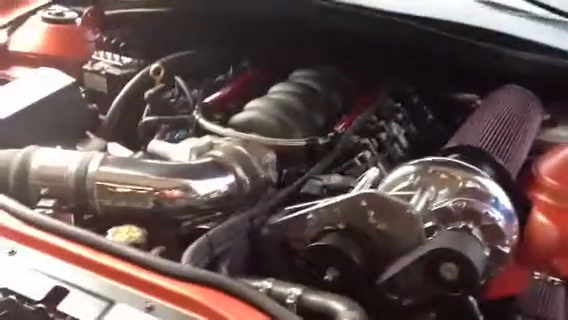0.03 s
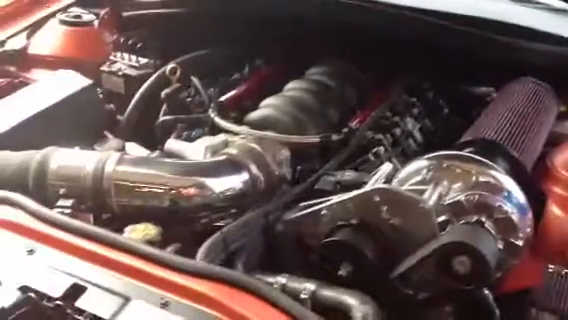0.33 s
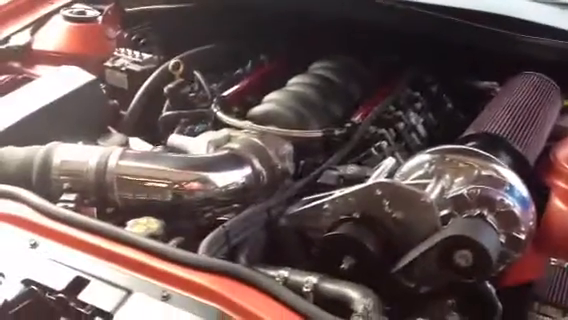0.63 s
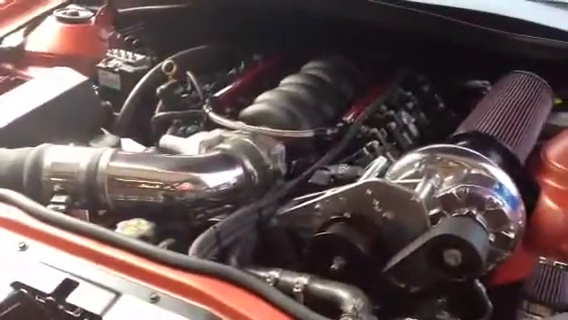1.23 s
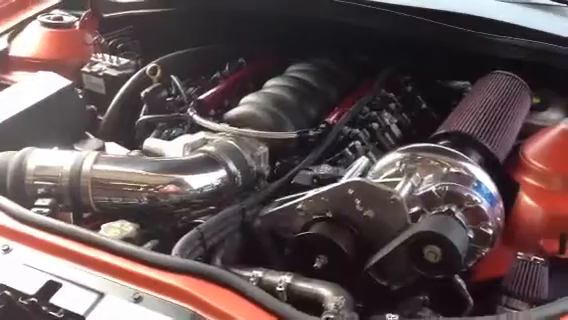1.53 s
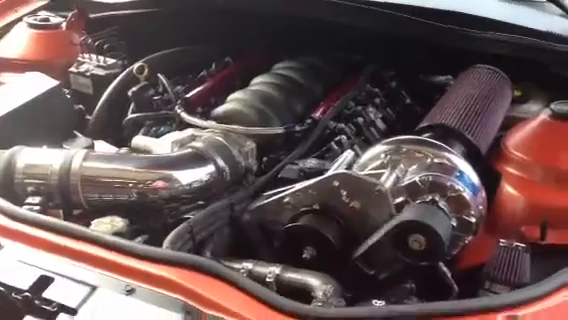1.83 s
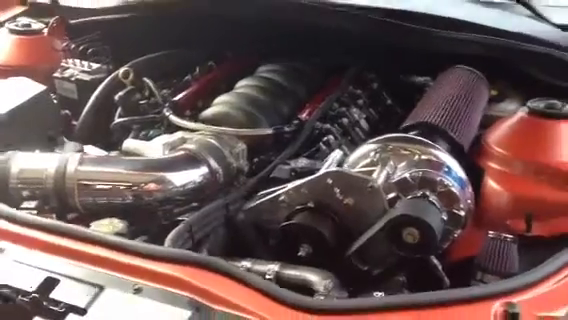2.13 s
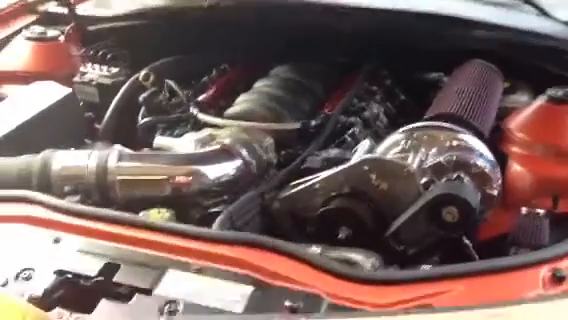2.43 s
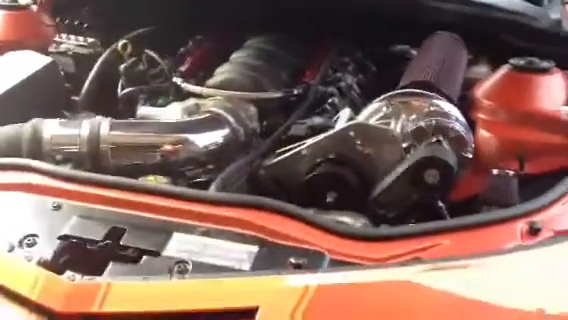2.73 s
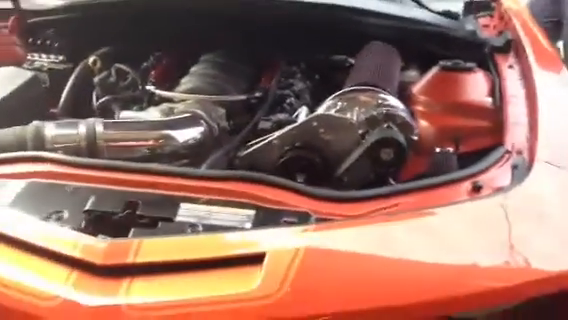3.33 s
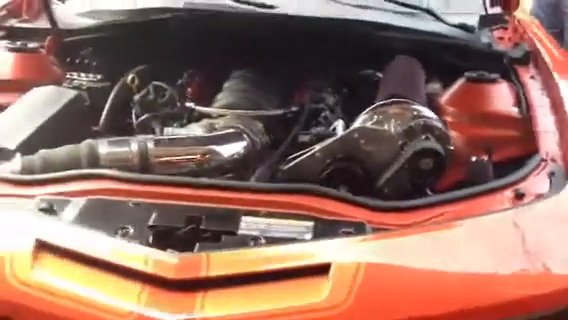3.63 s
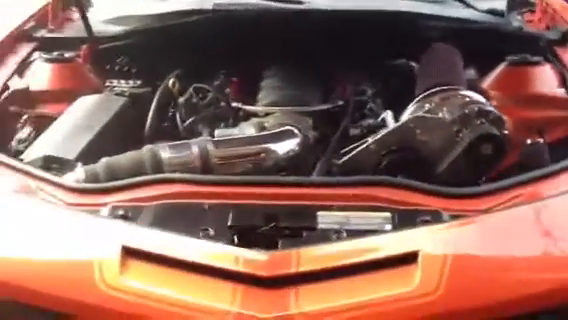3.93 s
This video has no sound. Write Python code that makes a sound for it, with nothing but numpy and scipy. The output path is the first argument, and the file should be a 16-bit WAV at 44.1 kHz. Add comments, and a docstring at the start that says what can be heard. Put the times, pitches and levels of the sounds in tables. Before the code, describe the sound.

A supercharged car engine idles for all four seconds, heard just above the open bonnet. A high, rapidly chirping squeal and thin whine waver and swell unevenly, strongest around 1.3 seconds. Beneath are a pulley hum, a lumpy exhaust rumble, light valve ticks and rushing air. From about 2 seconds the microphone moves back: the metallic ringing softens and the exhaust rises slightly while the squeal continues.

```python
"""At the open bonnet of an idling supercharged V8, microphone just above the engine bay.
Close up, each firing jerks the supercharger drive into a squealing chirp; its housing rings
and its whine wavers as the idle hunts. Underneath lie a pulley hum, the lumpy exhaust beat,
valve ticks and the rush of belts and intake air. From about halfway the microphone
moves back: the exhaust comes up a little and the lower housing rings fall away."""
import sys
import numpy as np
from scipy import signal
from scipy.fft import rfft, irfft
from scipy.io import wavfile
from scipy.ndimage import uniform_filter1d

SR = 44100
rng = np.random.default_rng(int(sys.argv[2]) if len(sys.argv) > 2 else 0)


def transcribe(u):
    """Save the signal u as a 16-bit wav file named by the first command-line argument.

    u: samples, shape (n,) or (channels, n), limited to [-1, 1]; the rate is SR.
    q: integer samples, one column per channel.
    """
    v = np.clip(np.atleast_2d(u).T, -1, 1)
    q = np.round(v * 32767).astype(np.int16)
    wavfile.write(sys.argv[1], SR, q)


N = 176400
TIME = np.arange(N) / SR

# The hunting idle: time_s, speed_rpm
CRANK_SPEED = [(0.0, 742), (0.71, 715), (0.8, 710), (1.1, 725), (1.56, 748), (1.77, 711), (1.9, 731),
               (2.02, 689), (2.27, 725), (2.74, 723), (2.8, 663), (2.84, 708), (3.43, 729), (3.55, 685),
               (3.68, 727), (4.0, 717)]
# Microphone to supercharger: time_s, distance (0 near, about 1 far)
MIC_DISTANCE = [(0, 0.14), (1.9, 0), (2.8, 0.67), (4, 1.1)]
# Supercharger drive: time_s, whine_pitch_hz, squeal_level_db
DRIVE_TRACK = [(0.0, 8146, -16), (0.09, 8021, -17), (0.14, 7930, -23), (0.21, 8037, -14.5),
               (0.28, 8015, -20), (0.32, 8000, -14), (0.38, 7786, -27.5), (0.43, 8080, -16),
               (0.49, 7666, -26), (0.57, 7750, -27.5), (0.66, 7982, -16.5), (0.72, 7768, -20),
               (0.86, 7550, -23.5), (0.9, 7978, -18), (1.0, 7925, -16), (1.05, 7604, -22),
               (1.16, 8170, -13), (1.28, 8060, -11), (1.34, 7874, -19.5), (1.42, 8030, -13),
               (1.6, 8205, -14), (1.66, 7990, -23.5), (1.72, 7717, -22), (1.77, 7914, -31),
               (1.81, 7990, -20), (1.94, 8040, -15), (1.99, 7860, -23.5), (2.06, 7495, -26),
               (2.16, 7556, -21), (2.21, 7544, -27), (2.27, 7925, -18.5), (2.33, 7809, -22),
               (2.38, 7990, -17.5), (2.5, 7893, -17.5), (2.55, 7540, -23), (2.61, 7905, -12.5),
               (2.7, 7850, -18), (2.79, 7328, -31.5), (2.84, 7730, -19), (2.96, 8030, -13.5),
               (3.01, 7560, -23.5), (3.11, 7520, -27), (3.16, 7720, -17.5), (3.2, 8006, -19),
               (3.42, 7840, -21), (3.5, 7620, -25), (3.56, 7840, -28), (3.66, 8005, -20.5),
               (3.73, 7530, -26.5), (3.81, 7666, -21), (3.85, 7970, -14), (4.0, 7610, -16)]
# How the housing radiates the squeal, dropping steeply above its resonance: frequency_hz, gain_db
HOUSING_RESPONSE = [(1500, -6), (2300, 9.5), (2600, -0.5), (2730, 1), (2820, 0), (2930, -2), (3030, -24),
                    (3300, -8), (4200, -11)]
# Tones above the squeal: whine_pitch_ratio, level_db, far_change_db, swell_share, throb_db, jitter_hz
WHINE_TONES = [(.672, -41.5, 4, .8, -1, 143.8), (1.0, -33, -3, 0.58, 4, 84.5),
               (1.338, -51.5, -4, 1, 1, 131.1)]
# Rings of the drive housing: pitch_hz, width_hz, level_db, far_change_db
HOUSING_RINGS = [(1858, 43, -40.5, -11), (2246, 94, -32.5, -10.5), (2427, 170, -28.5, -5.5),
                 (2670, 218, -23, -7), (3390, 350, -36.5, -8), (4715, 120, -42.5, -3),
                 (5380, 40, -38.5, 3.5), (6020, 99, -37, -3.5), (6705, 200, -41, -1.5)]
# Pulley hum: time_s, level_db
HUM_LEVEL = [(0, -34.5), (.4, -33.5), (.55, -29), (1.0, -30), (1.3, -34.5), (2.1, -30), (2.6, -32.5),
             (3.1, -36), (4, -37.5)]
# Tones of the exhaust beat: cycles_per_crank_turn, level_db
EXHAUST_ORDERS = [(4, -68), (6.5, -59), (7, -57.5), (7.5, -76), (8, -47.5), (9.5, -52), (10, -50),
                  (10.5, -60), (11, -39), (11.5, -61), (13, -52), (15.5, -45), (16, -50.5), (16.5, -51),
                  (33, -55)]
# Exhaust rumble: frequency_hz, relative_level_db
RUMBLE_SPECTRUM = [(20, -52), (55, -38), (68, -31), (85, -8.5), (110, -6.5), (133, 4), (150, -3), (190, -2),
                   (215, -5), (340, -7.5), (450, -18.5), (800, -31.5)]
# Ring of a valve tick: pitch_hz, relative_level_db, t60_s
VALVE_MODES = [(1867, -4.5, 0.032), (2240, 4.5, 0.024), (3670, 7.5, 0.01), (5475, 12.5, 0.011),
               (7300, 6.5, 0.0074), (12500, 0, 0.0054)]
# Belts and intake air, close up: frequency_hz, relative_level_db
RUSH_SPECTRUM = [(60, -48), (300, -13), (500, -14), (600, -11), (690, 2.5), (780, -4.5), (900, 3.5),
                 (1100, -6), (1300, -7), (1620, -6.5), (1850, -2.5), (2020, -4), (2400, -16), (2850, 7.5),
                 (2950, -13), (3040, -12), (3170, -6), (3300, -6), (3750, -4.5), (3950, -14), (4350, -13),
                 (4750, -7), (5400, -6), (6400, -7), (7600, -5.5), (8400, -6.5), (9700, -16),
                 (11000, -17.5), (11800, -19.5), (12900, -17), (14000, -29), (15300, -31)]
# Change in the rush from farther back: frequency_hz, gain_db
RUSH_FAR_COLOUR = [(300, -4), (600, 3.5), (900, 0.5), (1300, 1.5), (1900, -0.5), (2400, 6), (3400, -2.5),
                   (5200, 1), (8000, 1), (13000, 1.5)]

FIRINGS_PER_TURN = 4
USUAL_WHINE_HZ, USUAL_SQUEAL_DB = 7980, -19.5
SQUEAL_HZ, PULLEY_HZ = 2686, 906.5
CHIRP_DEPTH_DB, CHIRP_BEND_HZ, SQUEAL_JITTER_HZ = 8.5, 21.745, 33.4
LOPE_DB, LOPE_SHARPNESS, LOPE_SMEAR_TURNS = 3, 7.2, 0.09
RUMBLE_DB, RUSH_DB, TICK_DB, TICK_SPREAD_DB = -36.5, -27, -36.5, 15


def amp(db):
    """Decibels to gain."""
    return 10 ** (np.asarray(db) / 20)


def unit(x):
    """Scales to rms 1."""
    return x / np.sqrt(np.mean(x ** 2) + 1e-20)


def curve(rows):
    """Joins table rows by straight lines in time: one curve per column."""
    times, *columns = np.transpose(rows)
    return [np.interp(TIME, times, column) for column in columns]


def filtered(x, points):
    """Applies a response given as frequency_hz, gain_db points."""
    hz, db = np.transpose(points)
    gain_db = np.interp(np.log(np.fft.rfftfreq(N, 1 / SR) + 1), np.log(hz), db)
    return irfft(rfft(x) * amp(gain_db), N)


def noise(gain):
    """Noise of rms 1 whose spectrum is gain(hz)."""
    return unit(irfft(rfft(rng.standard_normal(N)) * gain(np.fft.rfftfreq(N, 1 / SR)), N))


def coloured(points):
    """Noise of rms 1 shaped by a spectrum table."""
    return unit(filtered(rng.standard_normal(N), points))


def wander(rate_hz):
    """Smooth random drift of rms 1, rolling off above the rate."""
    return noise(lambda f: 1 / (1 + (f / rate_hz) ** 4))


def tone(hz):
    """Sine of rms 1 along a pitch curve."""
    return np.sqrt(2) * np.sin(2 * np.pi * (np.cumsum(hz) / SR + rng.random()))


def throb(beat, depth_db):
    """Gain that swings with the firings and keeps the mean power."""
    gain = amp(depth_db * beat)
    return gain / np.sqrt(uniform_filter1d(gain ** 2, size=2756))


def squeal(whine_hz, level_db, beat, turns):
    """Each firing jerks the drive into a chirp; strong and weak ones often alternate."""
    swell_db = level_db - USUAL_SQUEAL_DB
    depth_db = np.maximum(CHIRP_DEPTH_DB + 0.41 * swell_db, 0)
    jitter_hz = SQUEAL_JITTER_HZ * noise(lambda f: f / (f + 70) / (1 + (f / 300) ** 4))
    jitter_hz *= amp(-0.49 * swell_db)  # loud chirps lock to a purer pitch
    hz = SQUEAL_HZ + .28 * (whine_hz - USUAL_WHINE_HZ) + CHIRP_BEND_HZ * (beat - .5) + jitter_hz
    scatter_db = 2 * wander(rate_hz=58)
    alternation_db = wander(rate_hz=3) * np.cos(np.pi * FIRINGS_PER_TURN * turns)
    return amp(level_db - 0.8 + scatter_db + alternation_db) * throb(beat, depth_db) * tone(hz)


def whine(whine_hz, swell_db, beat, far):
    """Rough upper tones of the drive, rising and falling with the squeal."""
    out = np.zeros(N)
    for ratio, db, far_db, share, throb_db, jitter_hz in WHINE_TONES:
        level_db = db + far_db * far + share * swell_db + 3.66 * wander(rate_hz=82)
        hz = ratio * whine_hz + jitter_hz * wander(rate_hz=349)
        out += amp(level_db) * throb(beat, throb_db) * tone(hz)
    return out


def housing(swell_db, beat, far):
    """Rubbing noise rings in the metal; the high rings follow the squeal most."""
    out = np.zeros(N)
    for hz, width_hz, db, far_db in HOUSING_RINGS:
        share = np.interp(hz, [2400, 5000], [.02, .8])
        ring = noise(lambda f: 1 / (1 + ((f - hz) / (0.62 * width_hz)) ** 2))
        out += amp(db + far_db * far + share * swell_db + .5 * beat) * ring
    return out


def pulley(whine_hz, beat):
    """A pulley on the same belt hums fuzzily, its pitch following the whine."""
    hz = PULLEY_HZ + 0.084 * (whine_hz - USUAL_WHINE_HZ) + 17.05 * wander(rate_hz=114.4)
    level_db = curve(HUM_LEVEL)[0] + 2.4 * wander(rate_hz=17)
    return amp(level_db) * throb(beat, depth_db=1) * tone(hz)


def exhaust(turns, far):
    """Crank orders bunch into one heavy beat every two turns, over a rumble that lopes with them."""
    orders = np.zeros(N)
    for order, db in EXHAUST_ORDERS:
        gain = amp(db + 2 * wander(rate_hz=3.8))
        smear = LOPE_SMEAR_TURNS * (rng.standard_normal() + .5 * wander(rate_hz=2.2))
        orders += gain * np.sqrt(2) * np.cos(2 * np.pi * (order * turns + smear))
    lope_db = LOPE_DB * np.exp(LOPE_SHARPNESS * (np.cos(np.pi * turns) - 1))
    firing_db = 1.7 * np.cos(2 * np.pi * FIRINGS_PER_TURN * turns)
    rumble = amp(RUMBLE_DB + lope_db + firing_db) * coloured(RUMBLE_SPECTRUM)
    return (orders + rumble) * amp(0.5 + 2.5 * far)  # louder from farther back


def valves(turns):
    """The valve train rings with light taps of uneven strength, two for each firing."""
    tap_samples = np.flatnonzero(np.diff(np.floor(2 * FIRINGS_PER_TURN * turns)))
    t, taps = TIME[:1500], np.zeros(N)
    taps[tap_samples] = amp(TICK_SPREAD_DB * rng.random(len(tap_samples)))
    scrape = signal.lfilter([1], [1, -np.exp(-1 / (0.00077 * SR))], taps) * rng.standard_normal(N)
    ring = sum(amp(db - 60 * t / t60) * np.sin(2 * np.pi * hz * t) for hz, db, t60 in VALVE_MODES)
    return amp(TICK_DB) * unit(signal.oaconvolve(scrape, ring)[:N])


def rush(swell_db, far):
    """Belt and air noise flutters, rises with the drive and changes colour with distance."""
    air = coloured(RUSH_SPECTRUM)
    at_mic = air + far * (filtered(air, RUSH_FAR_COLOUR) - air)
    return amp(RUSH_DB + 0.21 * swell_db + 1.44 * wander(rate_hz=21.5)) * at_mic


def scene():
    """The engine bay at one microphone: the crank times the beat, the drive sets every whine."""
    turns = np.cumsum(curve(CRANK_SPEED)[0]) / 60 / SR
    firing_angle = 2 * np.pi * (FIRINGS_PER_TURN * turns + .02 + 0.062 * wander(rate_hz=33))
    beat = np.cos(firing_angle + 0.4 * np.cos(firing_angle))  # one lopsided swing per firing
    whine_hz, level_db = curve(DRIVE_TRACK)
    swell_db = level_db - USUAL_SQUEAL_DB
    far = curve(MIC_DISTANCE)[0]
    chirps = filtered(squeal(whine_hz, level_db, beat, turns), HOUSING_RESPONSE)
    drive = chirps + whine(whine_hz, swell_db, beat, far) + housing(swell_db, beat, far)
    mix = drive + pulley(whine_hz, beat) + exhaust(turns, far) + valves(turns) + rush(swell_db, far)
    return mix[None]


def record(dry):
    """A soft limiter holds the loudest chirps; the treble ends at 15.4 kHz."""
    peak = np.sqrt(2 * np.abs(uniform_filter1d(dry ** 2, size=130)))
    held = dry / (1 + (peak / amp(-4.5)) ** 4) ** (1 / 4)
    lowpass = signal.firwin(511, 15400, window=("kaiser", 9), fs=SR)
    return signal.oaconvolve(held, lowpass[None], "same")


dry = scene()
out = record(dry)
transcribe(out)
```